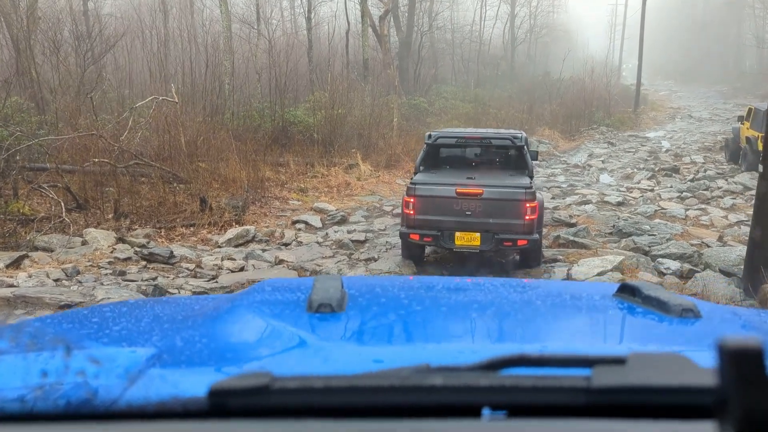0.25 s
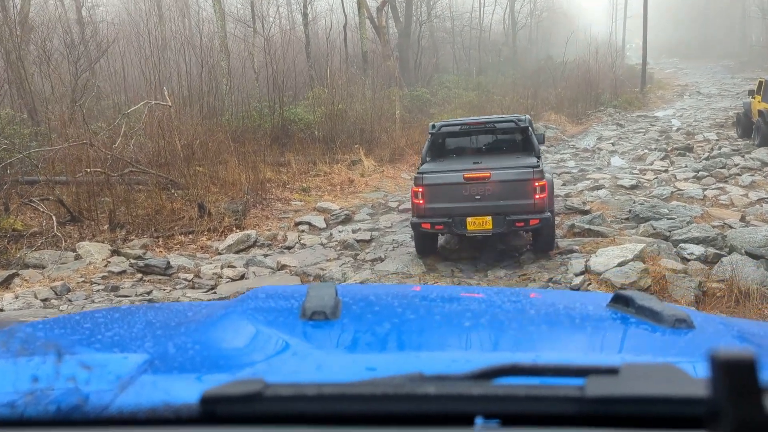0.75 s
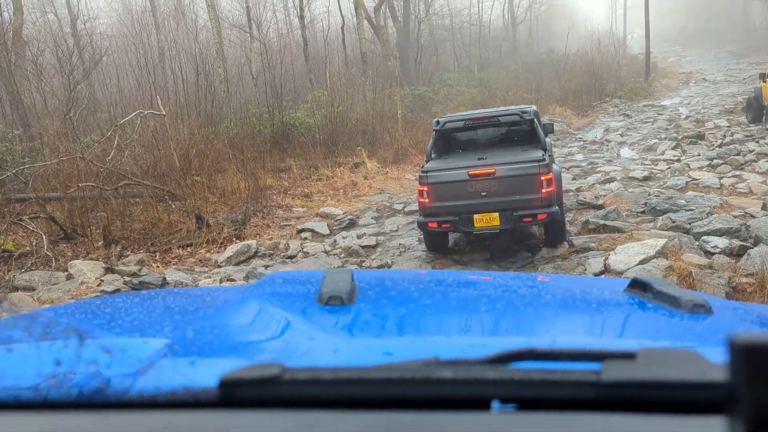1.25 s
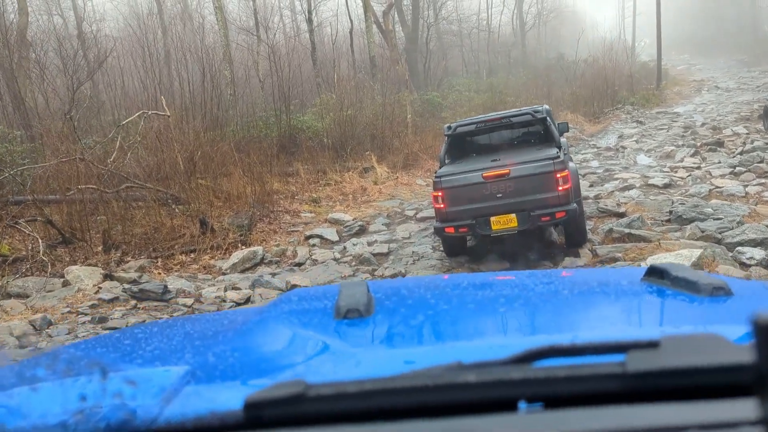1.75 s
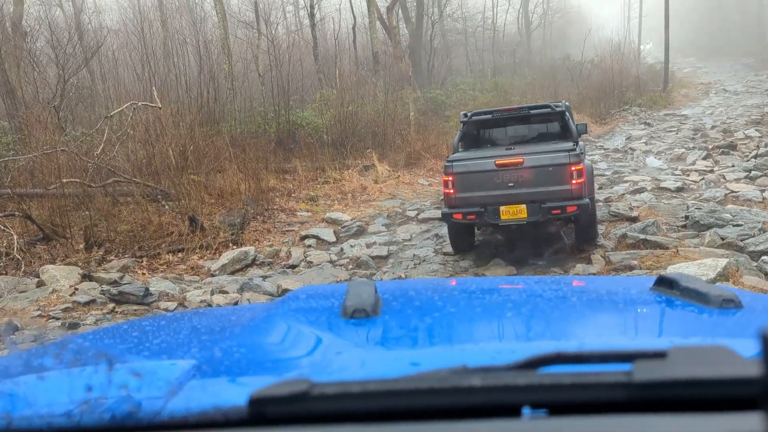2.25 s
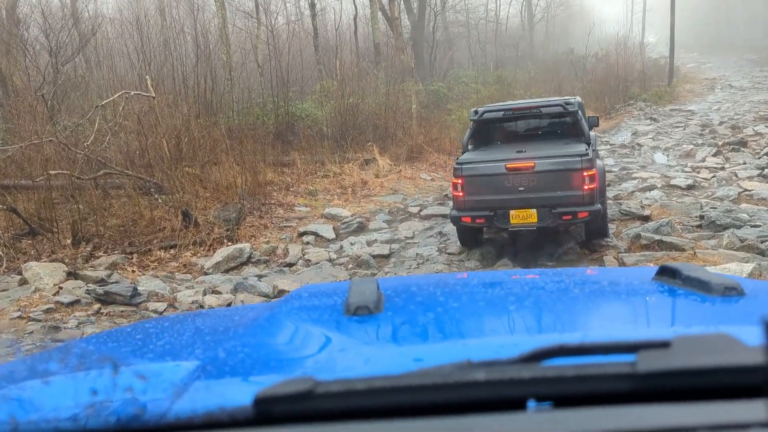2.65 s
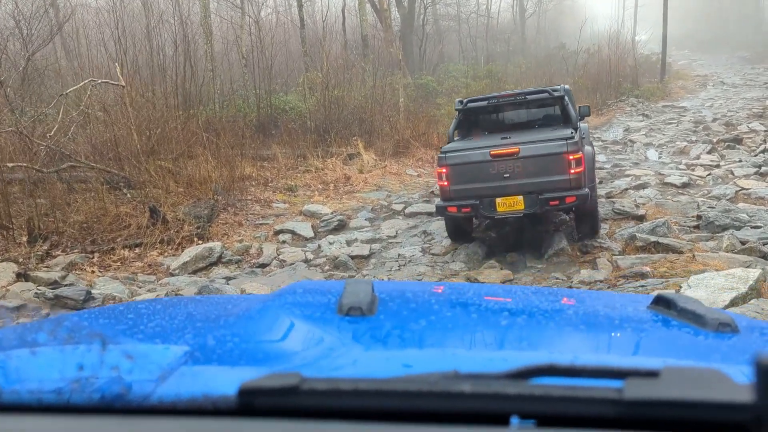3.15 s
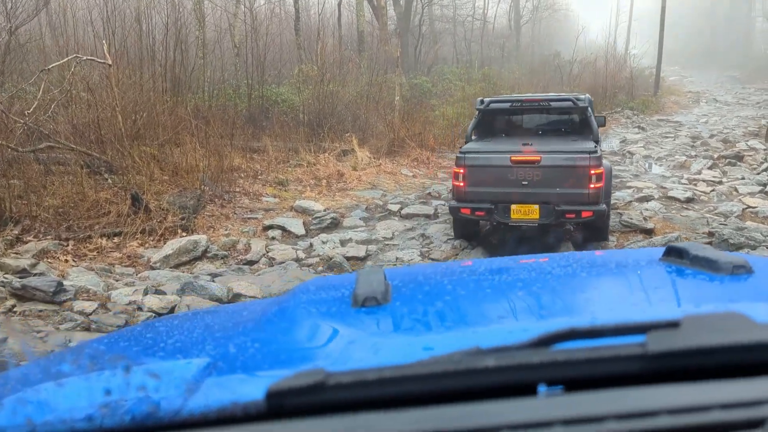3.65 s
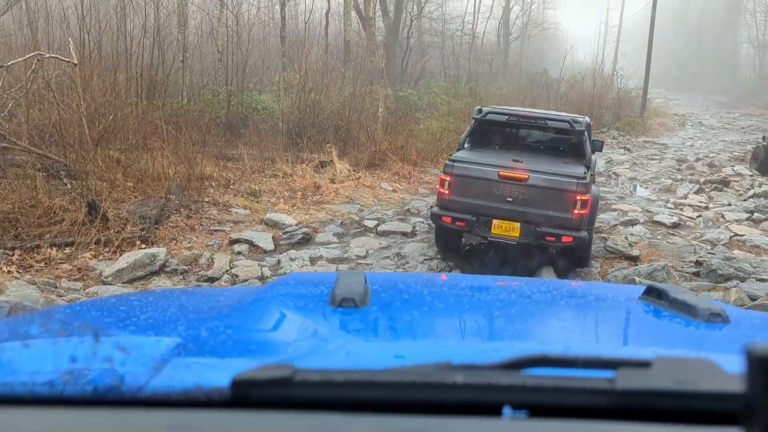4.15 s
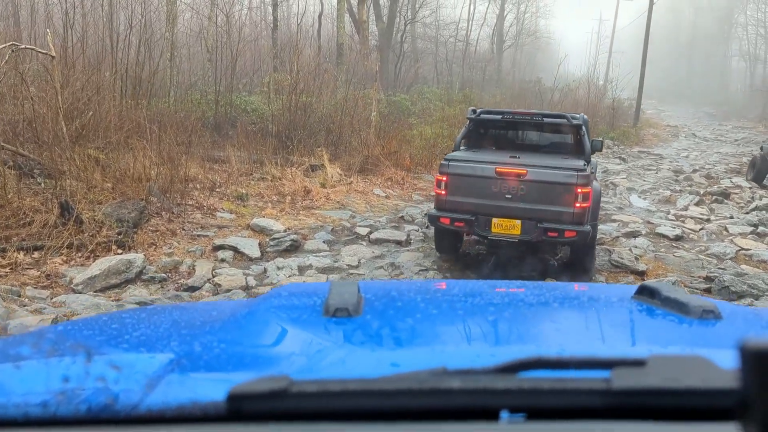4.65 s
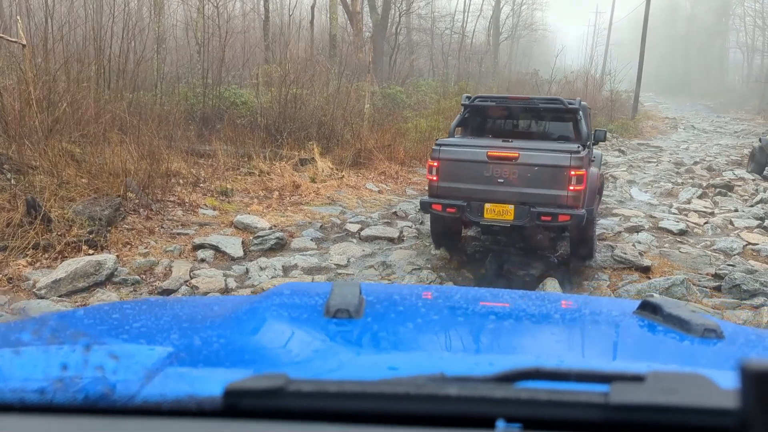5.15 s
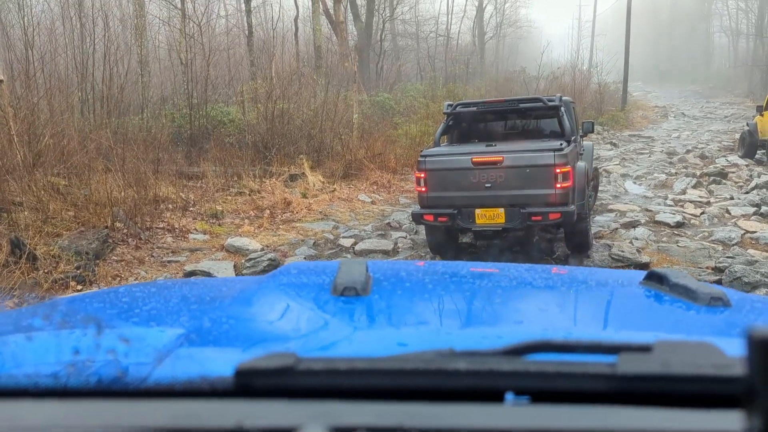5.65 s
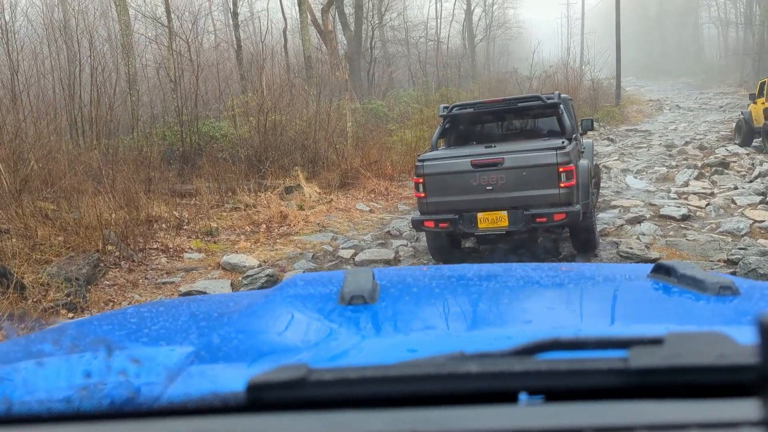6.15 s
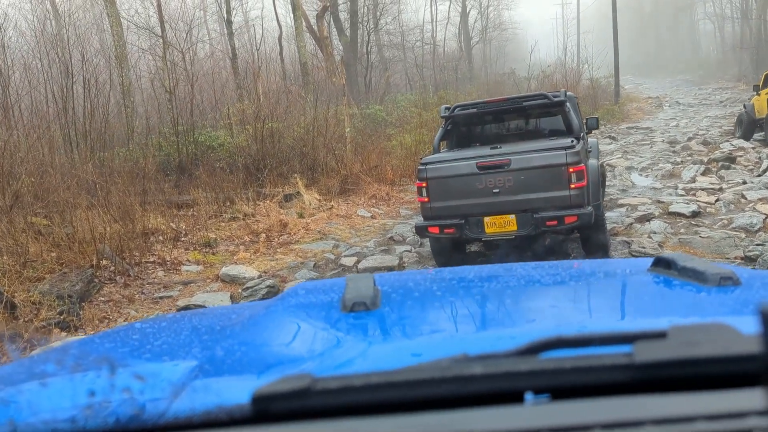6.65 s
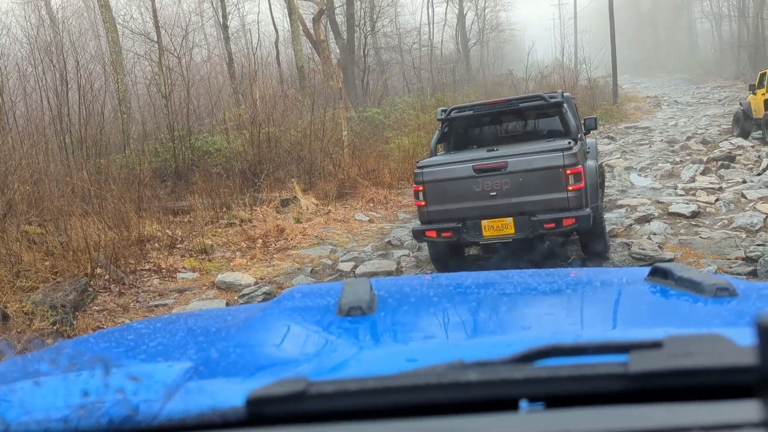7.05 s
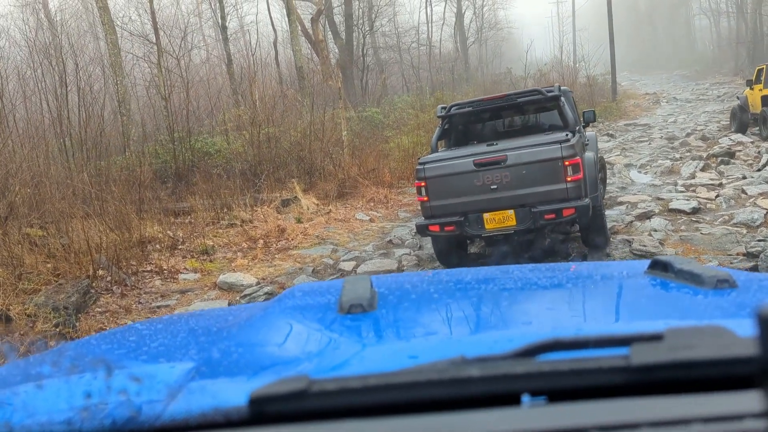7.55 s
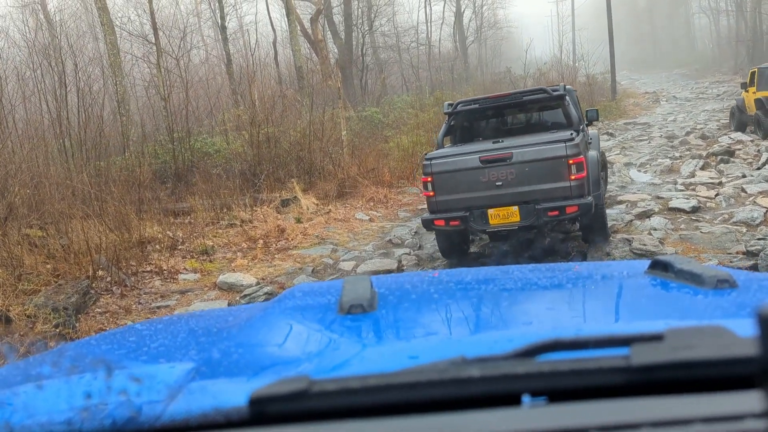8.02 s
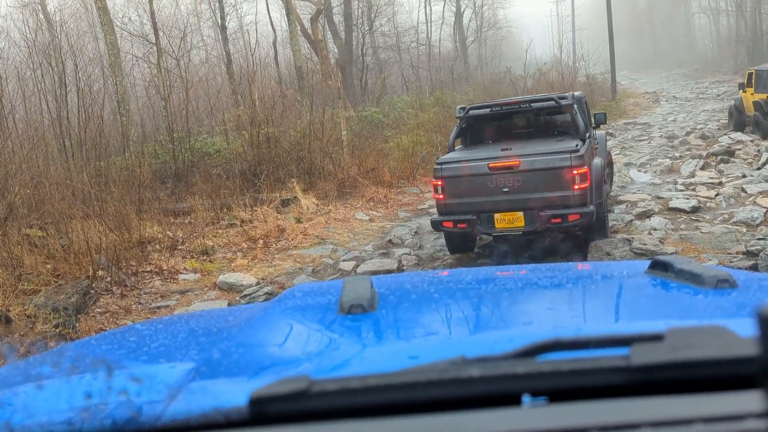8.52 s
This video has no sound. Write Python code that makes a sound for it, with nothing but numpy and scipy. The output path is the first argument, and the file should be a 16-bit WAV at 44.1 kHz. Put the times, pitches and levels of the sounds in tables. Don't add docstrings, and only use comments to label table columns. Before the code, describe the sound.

Inside an off-road car, a low engine drones and surges over rocks, with body thuds, drumming stones, ticking trim, rubbing cloth and a steady blower.

```python
import sys
import numpy as np
from scipy import signal
from scipy.fft import rfft, irfft, next_fast_len
from scipy.io import wavfile
from scipy.ndimage import uniform_filter1d

SR = 44100
rng = np.random.default_rng(int(sys.argv[2]) if len(sys.argv) > 2 else 0)


def gain_from_db(level_db):
    decades = np.asarray(level_db, float) / 20
    return 10 ** decades


def to_wav(s):
    ch = np.atleast_2d(s).T
    pcm = np.round(np.clip(ch, -1, 1) * 32767)
    wavfile.write(sys.argv[1], SR, pcm.astype(np.int16))


N = 387198
T = np.arange(N) / SR

# frequency in Hz, left-right correlation from 0 to 1.
SIDE_LIKENESS = [(60, 0.903), (130, 0.95), (290, 0.626), (640, 0.467), (1410, 0.12), (3100, 0.097),
                 (6820, 0.043), (15000, 0.046)]
# frequency in Hz, left over right in dB.
SIDE_LEAN = [(60, 1.5), (110, 3), (200, 5.5), (380, -1.5), (700, 1.5), (1290, -5), (2380, 3.5), (4400, 0.5),
             (8120, 7.5), (15000, -1)]

# frequency in Hz, width in Hz, level in dB.
DUCT_MODES = [(1241.8, 228, -64), (2092, 118, -71.5), (670, 43.8, -68), (4350, 36, -85.5)]

# frequency in Hz, density in dB per Hz.
RUMBLE_SPECTRUM = [(20, -48), (32, -19.5), (45, -2), (70, 10), (95, -0.5), (130, 0.5), (190, -0.5),
                   (260, -13.5), (400, -43.5)]
# frequency in Hz, density in dB per Hz.
ROAR_SPECTRUM = [(120, -47), (190, -1), (240, -4.5), (330, -1.5), (420, -5.5), (520, -9), (800, -13.5),
                 (1270, -20.5), (2000, -25.5), (2600, -69.5)]
# time in seconds, level in dB.
ROLLING_WEIGHT = [(0, -2.2), (0.6, 2), (1.7, 1.5), (2.4, 0.5), (2.8, 2.5), (3.5, 2), (3.95, 0), (4.4, 1),
                  (5.4, -1), (5.8, -0.5), (6.1, -1), (6.75, -2.5), (7.15, -2), (7.5, -4.5), (8.78, -2)]
# peak in seconds, roar in dB, rise and fall by 10 dB in seconds.
STONE_STRIKES = [
    (0.0, -49, 0.05814, 0.16),
    (0.64, -50.5, 0.087, 0.0225),
    (1.61, -47.5, 0.0067, 0.024),
    (3.45, -47.5, 0.0336, 0.029),
    (4.13, -50, 0.033, 0.097),
    (4.84, -48.5, 0.044, 0.221),
    (5.67, -52, 0.018, 0.056),
]

# peak in seconds, hiss in dB, rise and fall by 10 dB in seconds.
BODY_SWAYS = [(0.03, -53.5, 2.5, 0.0445), (0.125, -51.5, 2.06, 0), (0.21, -61, 0.4, 0.13),
              (0.285, -57, -0.54, 0.09), (0.35, -53.5, -0.73, 0.03), (0.46, -61.5, -0.3, -1),
              (0.55, -55.5, 0.1, 0.18), (1.06, -52, 0.24, 0.26), (1.21, -53.5, 0.4656, 0.19),
              (1.53, -51, 0.2535, 0.27), (1.79, -53.5, 0.13, 0.5), (2.5, -55.5, 0.12, 0.11),
              (2.63, -56, 0.3473, 0.1467), (3.0, -52, 0.22, 0.5845), (3.22, -50.5, 0.2448, 0.1143),
              (3.44, -51.5, 0.11, 0.1625), (3.68, -55.5, 0.22, 0.1456), (4.06, -54, 0.14, 0.4148),
              (4.55, -56, 0.06, 1.18), (4.89, -48, 0.08, 0.0535), (4.96, -40, 0.0458, 0.021),
              (5.03, -48.5, 0.1344, 0.1234), (5.66, -57, -0.03, 0.1361), (5.9, -64.5, 0.34, 0.82),
              (6.53, -60, 0.06, 0.44), (7.03, -62, 0.72, -0.1), (7.34, -51, 0.0937, 0.52),
              (7.56, -46.5, 0.1538, 0.0523), (7.84, -45.5, 0.133, 0.0866), (8.0, -46, 0.1616, 0.1484),
              (8.13, -60, 0.1, 0.3), (8.4, -57, 0.67, 0.11), (8.67, -63.5, 0.95, -4)]
# centre in seconds, depth in dB, half width in seconds.
CLOTH_LULLS = [(0.165, 2.5, 0.0174), (0.7, 0.5, 0.034), (1.675, 5.5, 0.03617), (2.745, 1.5, 0.031),
               (4.27, 2.5, 0.0387), (4.81, 4, 0.0324), (5.428, 7, 0.03), (6.02, -0.5, 0.018),
               (6.245, 1, 0.0304), (6.395, 6.5, 0.0229), (6.74, 1, 0.0265), (6.87, 4, 0.045),
               (7.138, 9, 0.024), (7.27, 5, 0.0141), (7.625, -0.5, 0.032), (8.78, 9.5, 0.034)]
# frequency in Hz, density in dB per Hz.
HISS_SPECTRUM = [(1760, -12), (3000, -5), (3640, -6.5), (3960, -4.5), (5330, -8.5), (7280, -5), (8020, -11),
                 (8900, -3.5), (11500, -0.5), (13500, -8.5), (14700, -4.5), (15750, -5.5)]
# peak in seconds, level in dB, rise and fall by 10 dB in seconds.
STIFF_RUBS = [(0.12, -42.5, 0.0345, 0.0465), (0.06, -61.5, 0.071, 0.036), (0.27, -48.5, 0.053, 0.044),
              (0.34, -52.5, 0.029, .04), (1.35, -63.5, 0.029, .05), (1.43, -57.5, 0.029, 0.0301),
              (1.96, -57, 0.091, .08), (2.575, -49, 0.02011, 0.0195), (3.35, -54, .03, 0.033),
              (3.93, -55, .04, 0.0513), (4.42, -70.5, 0.0501, 0.078), (4.72, -55, 0.0497, 0.0396),
              (4.9, -47, .03, 0.0312), (5.17, -59, .1, 0.1026), (5.57, -58, 0.0265, 0.032),
              (5.67, -55, 0.01456, 0.029), (5.8, -56.5, .06, 0.055), (7.36, -45.5, 0.038, 0.156),
              (7.5, -54, .03, 0.0315), (7.82, -46, 0.02963, 0.032), (8.43, -60.5, .03, 0.039),
              (8.6, -61, 0.153, 0.103)]
# frequency in Hz, density in dB per Hz.
STIFF_SPECTRUM = [(5000, -19), (7350, -4), (8000, -10.5), (11000, -4), (12200, 1), (13000, -10.5),
                  (14600, -1.5), (15800, -8)]
# peak in seconds, creak in dB, rise and fall by 10 dB in seconds.
SEAT_STRAINS = [
    (0.6, -51, 0.05, 0.04),
    (1.16, -48.5, 0.045, 0.0513),
    (3.2, -52.5, 0.37, 0.121),
    (4.87, -49.5, 0.034, 0.139),
    (7.58, -48, 0.033, 0.035),
    (7.7, -54, 0.059, 0.033),
    (8.04, -49, 0.204, 0.061),
    (8.16, -50.5, 0.077, 0.035),
]
# frequency in Hz, density in dB per Hz.
CREAK_SPECTRUM = [(700, -4.5), (1100, -3), (1600, -6), (2100, -3.5), (2350, -5.5), (2650, -3), (3050, -10),
                  (3600, -15), (5000, -19), (8000, -29.5)]

# time in seconds, level in dB, pitch of its bands as a factor.
AIRY_HISS_PATH = [
    (7.14, -92, 0.988),
    (7.2, -65, 0.9954),
    (7.28, -55.5, 1),
    (7.31, -48.5, 1.0),
    (7.35, -47, 1.0),
    (7.4, -47, 0.996),
    (7.45, -53, 1.0),
    (7.5, -79.5, 0.994),
]
# frequency in Hz, width in Hz, level in dB.
AIRY_HISS_BANDS = [(1977, 94, -6.5), (4221, 61, -4.5), (7190, 260, -11), (8730, 102, -13.5),
                   (4440, 180, -7.5), (2253, 85, -4.5), (5660, 1420, -8.5), (2954, 270, -8),
                   (3740, 210, -9.5)]

# start in seconds, peak in dB, ring in Hz, left over right in dB.
BRIGHT_TRIM = [(0.068, -43.5, 1690, 5), (0.25, -41.5, 2710, 6), (0.395, -47, 1662, 7.5),
               (0.4653, -41.5, 1740, 11.5), (0.5543, -40.5, 1911, 3), (0.5894, -39, 1920, -1),
               (0.623, -40, 1555, -2), (1.1135, -43.5, 1700, 5.5), (1.1744, -42.5, 2200, 7.5),
               (1.6072, -42.5, 2571, 2.0), (3.4395, -33, 1548, 0.5), (3.443, -38, 2480, 0.5),
               (3.449, -42, 1590, 4.5), (3.5254, -46, 1951, 2), (4.5505, -41, 2198, 2),
               (4.7561, -35, 2703, 11.5), (4.8761, -39.5, 2001, 12.5), (4.88, -40.5, 2500, 8),
               (4.889, -40, 2200, 8), (4.896, -46, 1500, 6.5), (4.852, -40.5, 1500, 4),
               (4.884, -40, 1600, 10.5), (4.905, -46, 1780, 6), (5.035, -40, 1240, 5.5),
               (5.065, -47, 2790, 8), (4.958, -38.5, 1930, 11), (5.1008, -42.5, 1510, 1.5),
               (1.0742, -35.5, 1900, 11), (7.5727, -37.5, 2330, 6), (7.58, -38, 2390, 7),
               (7.59, -44, 1606, 5.5), (7.7, -44, 2100, 3), (7.518, -46.5, 2290, 4),
               (7.548, -48, 2000, 5.5), (7.613, -45.5, 2026, 6), (8.016, -42, 1599, 2.5),
               (8.031, -39, 2050, 2), (8.0443, -41, 2402, 0.5), (8.138, -48.5, 1800, 0),
               (8.169, -45.5, 1927, -1)]
# start in seconds, peak in dB, ring in Hz, left over right in dB.
DULL_TRIM = [(0.727, -42.5, 822.7, 11), (1.114, -39, 805, 7), (1.607, -34, 697, -5),
             (2.08, -39, 845.2, -11), (2.659, -44, 1257, -1.5), (3.078, -42.5, 1238, -7.5),
             (3.39, -41, 959.6, 1), (3.44, -41, 670, 5), (3.729, -34.5, 1060, 10),
             (4.127, -44.5, 689.9, 3.5), (4.821, -38.5, 600.6, 1.5), (4.844, -57, 625, 0.5),
             (4.861, -49.5, 643.1, -2), (4.886, -36, 662, -2.5), (4.93, -34, 578, -3.5),
             (5.049, -37, 1050, 8), (5.102, -40, 596, -3.5), (5.202, -43.5, 1208, -4.5),
             (7.041, -42.5, 636, -0.5), (8.135, -46.5, 701.1, -4)]
# start in seconds, peak in dB, ring in Hz, left over right in dB.
THIN_TRIM = [
    (4.5492, -31, 6400, 2.5),
    (5.1865, -40, 8200, 3.5),
    (4.972, -40.5, 2220, 5),
    (5.05, -42, 2170, 4.5),
    (5.101, -41.5, 2190, 0),
]
# start in seconds, peak in dB, ring in Hz, left over right in dB.
PANEL_KNOCKS = [(1.0755, -28.5, 2184, 10.5), (1.079, -38, 4198, 8), (1.08, -40.5, 6900, 7),
                (1.1548, -41.5, 2390, 4.5), (1.179, -45, 2410, 6.5), (2.5672, -33.5, 2722, 21.5),
                (3.3895, -39, 2440, -3.5), (4.9605, -34, 2616, 3.5), (4.983, -41, 2800, 8),
                (5.6674, -44, 2890, 7), (5.6715, -37, 2760, 4.5), (5.676, -40, 2750, 3.5),
                (5.677, -43, 2000, 3.5), (5.68, -42, 3600, 7), (7.528, -40, 4000, 8.5),
                (7.5872, -37, 2700, 5.5), (7.588, -37, 6000, 7), (7.8344, -38.5, 2685, 13),
                (8.372, -45.5, 2900, -1), (8.428, -45, 3903, 2.5)]

# start in seconds,
# peak in dB, start pitch in Hz, end pitch in Hz, T60 in seconds.
BODY_BLOWS = [(3.101, -27.5, 123.4, 123.3, 0.395), (3.43, -9.5, 99.7, 85, 0.114),
              (3.456, -16.5, 77.5, 71.6, 0.33), (3.465, -20.5, 53.2, 49.5, 0.675),
              (3.439, -34.5, 300, 302.4, 0.11), (3.63, -38.5, 310, 302.8, 0.074),
              (3.949, -45.5, 267, 265.6, 0.45), (4.82, -31, 304.3, 300.5, 0.103),
              (4.681, -35, 87.5, 84, 0.2466), (4.866, -15, 114.3, 104.7, 0.145),
              (4.872, -14, 80.7, 72.2, 0.422), (4.905, -19.5, 51.2, 44.74, 0.63),
              (4.953, -21.5, 254.7, 215, 0.133), (1.601, -31.5, 267.9, 261.5, 0.178),
              (1.721, -35.5, 241.6, 230.2, 0.367), (1.998, -31.5, 328, 316, 0.202),
              (5.15, -29, 204.7, 197.6, 0.147), (5.669, -30.5, 352.6, 306, 0.222),
              (7.76, -35, 207.5, 212.4, 0.315), (5.5, -43, 314.4, 319.7, 0.36),
              (5.8, -38, 331.5, 313.3, 0.62)]

# time in seconds, firing rate of a bank in Hz,
# load in dB.
CRAWL_REVS = [(0.0, 27.12, -33), (0.19, 26.97, -32), (0.26, 26.33, -24.5), (0.36, 24.92, -28.5),
              (0.5, 24.92, -24), (0.64, 26.75, -24.5), (0.74, 27.68, -30), (0.95, 27.55, -37),
              (1.07, 26.86, -29.5), (1.21, 27.14, -40), (1.29, 27.1, -34), (2.13, 27.57, -37.5),
              (2.81, 27.55, -37), (2.96, 27.2, -36.5), (3.5, 27.15, -35.5),
              (3.58, 27.3, -40), (3.64, 26.36, -33.5), (3.82, 26.11, -29.5), (3.98, 26.68, -39.5),
              (4.06, 26.67, -32), (4.18, 26.91, -36.5), (4.62, 26.21, -27), (4.75, 26.1, -26.5),
              (4.85, 26.23, -37), (4.95, 26.25, -31.5), (5.01, 26.28, -34), (5.07, 25.71, -27),
              (5.12, 25.72, -31), (5.179, 25.33, -48.5)]
# time in seconds, firing rate of a bank in Hz, load in dB.
SURGE_REVS = [
    (5.2, 39.49, -42.5),
    (5.32, 37.14, -39),
    (5.47, 37.31, -34),
    (5.61, 40.31, -28.5),
    (5.77, 36.52, -30),
    (5.96, 32.85, -34.5),
    (6.41, 32.7, -36),
    (6.6, 29.91, -39),
    (6.71, 28.12, -46),
]
# time in seconds, firing rate of a bank in Hz, load in dB.
SETTLE_REVS = [
    (6.84, 28.24, -46),
    (7.15, 29.34, -42),
    (7.45, 30.37, -36.5),
    (8.78, 30.13, -39),
]
# multiple of the firing rate, level in dB, share of the load followed.
CRAWL_ORDERS = [(2, -37, 0.29), (4, -9.5, 0.985), (6, 0, 1)]
# multiple of the firing rate, level in dB, share of the load followed.
SURGE_ORDERS = [(2, -0.35, 0.996), (3, -0.5, 0.999), (4, -1.12, 0.974), (5, 0, 0.984)]
# multiple of the firing rate, level at full load in dB.
CRAWL_UPPER_ORDERS = [(8, -34), (10, -34), (12, -39), (14, -41), (16, -39.5), (18, -48)]
# multiple of the
# firing rate, level at full load in dB.
SURGE_UPPER_ORDERS = [(1, -20), (6, -35), (7, -37), (8, -36.5), (9, -39), (10, -42.5), (11, -39.5)]
# frequency in Hz, gain in dB.
NO_BOOM = [(20, 0), (400, 0)]
# frequency in Hz, gain in dB.
CAB_BOOM = [(58, -4), (70, -0.15), (79, -4), (90, -16.5), (101, 0.5), (118, -22.5), (131, -8), (141, -9),
            (149, 1.5), (165, -6.5), (190, -22.5)]
# frequency in Hz, gain in dB.
CAB_PANELS = [(30, -14.5), (200, -2), (250, -4), (290, -6), (318, 3.5), (350, -7.5), (500, -40.5)]


def evened(x):
    return x / np.sqrt(np.mean(x ** 2) + 1e-20)


def read(points, hz):
    f, value = np.transpose(points)
    return np.interp(np.log(hz + 1), np.log(f + 1), value)


def columns(rows, t=T):
    s, *values = np.transpose(rows)
    return [np.interp(t, s, v) for v in values]


def add(mix, s, sound):
    part = mix[..., round(s * SR):][..., :sound.shape[-1]]
    part += sound[..., :part.shape[-1]]


def wander(per_s):
    span = int(SR / per_s)
    return evened(uniform_filter1d(uniform_filter1d(rng.standard_normal(N), span), span))


def ring(x, hz, width):
    r = np.exp(-np.pi * width / SR)
    return signal.lfilter([1, 0, -1], [1, -2 * r * np.cos(2 * np.pi * hz / SR), r * r], x)


def noise(spectrum, patchy_db, flicker_db, size):
    frames, hz = 4 * N // size + 5, np.fft.rfftfreq(size, 1 / SR)
    a, b, c, d, patches = rng.standard_normal((frames, len(hz), 5)).T
    patches = uniform_filter1d(patches, size=4, axis=0)
    patches = evened(uniform_filter1d(patches, size=14, axis=1))
    flicker = evened(uniform_filter1d(rng.standard_normal(frames), size=5))
    same = np.clip(read(SIDE_LIKENESS, hz), -1, 1)[:, None]
    left = a + 1j * b
    right = same * left + np.sqrt(1 - same ** 2) * (c + 1j * d)
    gain_db = read(spectrum, hz)[:, None] + patchy_db * patches + flicker_db * flicker
    z = np.array([left, right]) * gain_from_db(gain_db)
    return evened(signal.istft(z, nperseg=size, noverlap=size - size // 4)[1][:, :N])


def grain(per_s, depth, ring_s):
    hits = (rng.random(N) < per_s / SR) * np.minimum(rng.exponential(1, N), 2)
    return 1 + depth * signal.lfilter([1], [1, -np.exp(-1 / (ring_s * SR))], hits)


def bumps(rows, floor_db):
    power = gain_from_db(floor_db) ** 2
    for s, db, rise_s, fall_s in rows:
        away = np.maximum((s - T) / abs(rise_s), (T - s) / abs(fall_s))
        power = power + gain_from_db(db - 10 * away ** 1.217) ** 2
    return 10 * np.log10(power)


def blower():
    air = rng.standard_normal((2, N))
    turns = 2 * np.pi * np.cumsum(1238.5 + 0.7814 * wander(5.74)) / SR
    phase = np.array([[0], [2.3]])
    out = np.sqrt(2) * gain_from_db(-63.5 + 0.5 * wander(5.6)) * np.sin(turns + phase)
    for hz, width, db in DUCT_MODES:
        out += gain_from_db(db + 4.0) * evened(ring(ring(air, hz, width), hz, width))
    return out


def road(sway_db):
    roll_db, = columns(ROLLING_WEIGHT)
    rumble_db = -42 + 1.063 * roll_db + 0.118 * (sway_db + 59.0)
    rumble = noise(RUMBLE_SPECTRUM, patchy_db=-1.22, flicker_db=2.0, size=2048)
    roar_db = bumps(STONE_STRIKES, -55.5 + roll_db + 0.093 * (sway_db + 56.0))
    roar = grain(per_s=45, depth=0.506, ring_s=0.0034)
    roar = roar * noise(ROAR_SPECTRUM, patchy_db=1.32, flicker_db=0.6, size=1024)
    return gain_from_db(rumble_db) * rumble + gain_from_db(roar_db + 6.0) * evened(roar)


def lulls():
    return sum(db * np.exp(-((T - s) / half_s) ** 2) for s, db, half_s in CLOTH_LULLS)


def rustle(sway_db):
    hiss = noise(HISS_SPECTRUM, patchy_db=1.5, flicker_db=1.0, size=512)
    creak = grain(per_s=81, depth=0.374, ring_s=0.00264)
    creak = evened(creak * noise(CREAK_SPECTRUM, patchy_db=0.0, flicker_db=-2.0, size=512))
    creak_db = bumps(SEAT_STRAINS, -59 + 0.705 * (sway_db + 57))
    stiff = noise(STIFF_SPECTRUM, patchy_db=6.5, flicker_db=1.0, size=512)
    stiff_db = bumps(STIFF_RUBS, -89.5)
    return gain_from_db(stiff_db) * stiff + gain_from_db(sway_db + 2.5) * hiss + gain_from_db(creak_db + 1.2) * creak


def airy_hiss():
    level_db, shift = columns(AIRY_HISS_PATH)
    source, out = rng.standard_normal((2, N)), np.zeros((2, N))
    for hz, width, db in AIRY_HISS_BANDS:
        bend = np.exp(2j * np.pi * np.cumsum(hz * (shift - 1) * 0.308) / SR)
        band = signal.hilbert(evened(ring(source, hz, width)), next_fast_len(N))[:, :N]
        out += gain_from_db(db + 1.17 * wander(29.38)) * (bend * band).real
    return gain_from_db(level_db) * out


def ticks(rows, width, length_s, trim_db, rebound):
    out, ears = np.zeros((2, N)), np.arange(2)[:, None]
    for s, db, hz, pan_db in rows:
        late_s, sign = rng.random((2, 2, 6))
        late_s = 0.001025 + 3 * length_s * late_s
        knocks = np.zeros((2, 1600))
        decay = np.exp(-late_s / (2 * length_s))
        knocks[ears, (late_s * SR).astype(int)] = rebound * np.sign(sign - .5) * decay
        knocks[0, 6] = knocks[1, round(4 * sign[1, 0])] = 1
        contact = np.hanning(int(0.517 * SR / hz) + 3)
        knocks = signal.lfilter(contact, 1, knocks)
        burst = 0
        for k, share in ((1, 1), (.68, -.25), (1.6, -.25)):
            mode = ring(ring(knocks, k * hz, k * width * hz), k * hz, k * width * hz)
            burst = burst + share * mode / abs(mode).max()
        pan = gain_from_db(np.array([[pan_db], [-pan_db]]) / 4)
        add(out, s + .0005, gain_from_db(db + trim_db) * burst * pan)
    return out


def thuds():
    out, t = np.zeros(N), np.arange(SR // 2) / SR
    for s, db, start_hz, end_hz, t60 in BODY_BLOWS:
        hz = end_hz + (start_hz - end_hz) * np.exp(-t / 0.0301)
        swell = 1 - np.exp(-t / 0.0128)
        add(out, s, gain_from_db(db - 60 * t / t60) * swell * np.sin(2 * np.pi * np.cumsum(hz) / SR))
    return out


def engine(rows, main, boom, upper, waver_db):
    hz, load_db = columns(rows)
    turns = 2 * np.pi * np.cumsum(hz * (1 + 0.002601 * wander(30.47))) / SR
    strong, weak = np.zeros(N), np.zeros(N)
    for (k, db, share), waver in zip(main, waver_db):
        level_db = db + share * load_db + read(boom, k * hz) + waver * wander(14.3)
        strong += gain_from_db(level_db) * np.sin(k * turns + 6 * rng.random())
    for k, db in upper:
        level_db = db + read(CAB_PANELS, k * hz) + 2.43 * wander(11.6)
        weak += gain_from_db(level_db) * np.sin(k * turns + 6 * rng.random())
    out = strong + gain_from_db(0.5578 * load_db + 0.16) * weak
    running = uniform_filter1d(1. * (T >= rows[0][0]) * (T <= rows[-1][0]), size=600)
    return np.sqrt(2) * out * running


def scene():
    sway_db = bumps(BODY_SWAYS, -78.5) - lulls()
    trim = ticks(BRIGHT_TRIM, width=0.426, length_s=0.0019, trim_db=0.0, rebound=0.66)
    trim += ticks(DULL_TRIM, width=0.291, length_s=0.0043, trim_db=-2.5, rebound=0.455)
    trim += ticks(THIN_TRIM, width=0.71, length_s=0.0015, trim_db=-1.5, rebound=1.0)
    trim += ticks(PANEL_KNOCKS, width=0.194, length_s=0.0015, trim_db=-0.07, rebound=0.366)
    drone = engine(CRAWL_REVS, CRAWL_ORDERS, NO_BOOM, CRAWL_UPPER_ORDERS, waver_db=(2.5, 1.5, 1.1))
    drone += engine(SURGE_REVS + SETTLE_REVS, SURGE_ORDERS, CAB_BOOM, SURGE_UPPER_ORDERS,
                    waver_db=(0.92, 1.8, 1.34, 0.92))
    return blower() + road(sway_db) + rustle(sway_db) + airy_hiss() + trim + thuds() + drone


def top_cut(x):
    return signal.sosfilt(signal.butter(12, 15890, fs=SR, output="sos"), x)


def record(dry):
    size = next_fast_len(N + 4096)
    hz = np.fft.rfftfreq(size, 1 / SR)
    lean = gain_from_db(read(SIDE_LEAN, hz) / 2)
    early = np.exp(2j * np.pi * hz * .00014)
    bass_cut = 1 / np.sqrt(1 + (38 / (hz + 1)) ** 8)
    response = np.array([lean * early, 1 / lean]) * bass_cut * (hz < 15790)
    ports = irfft(rfft(dry, size) * response, size)[:, :N]
    return top_cut(ports)


dry = scene()
out = record(dry)
to_wav(out)
```